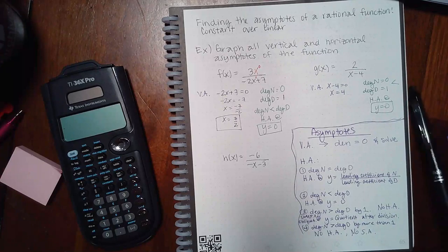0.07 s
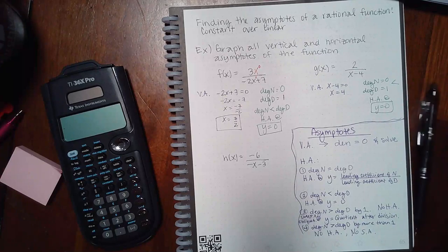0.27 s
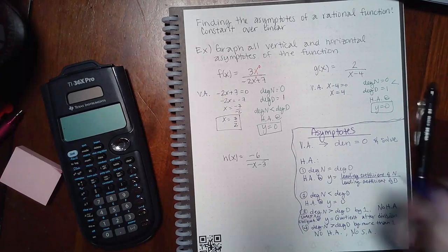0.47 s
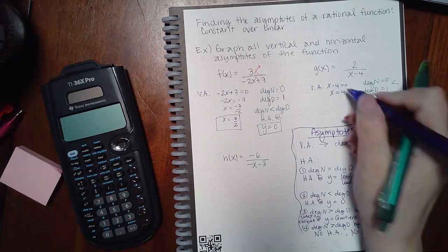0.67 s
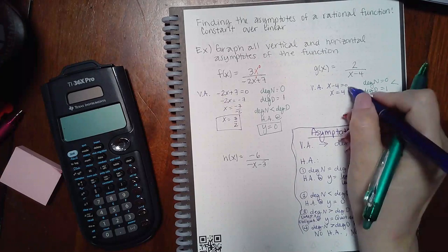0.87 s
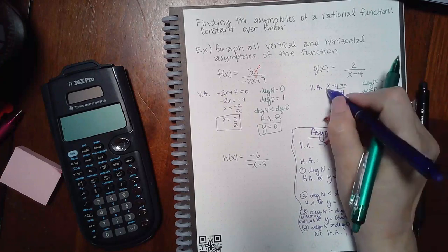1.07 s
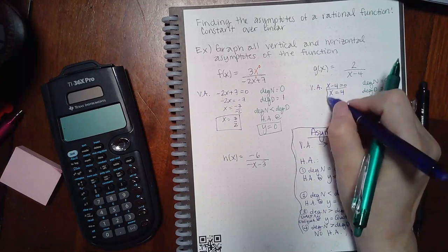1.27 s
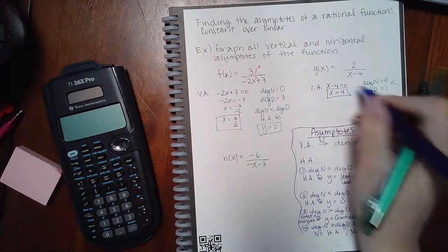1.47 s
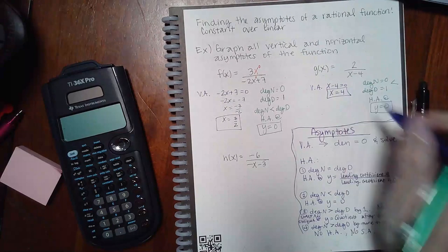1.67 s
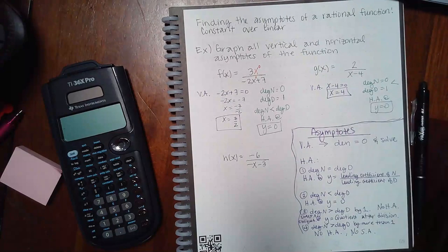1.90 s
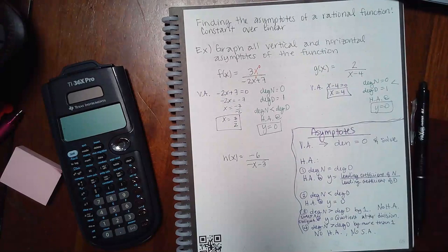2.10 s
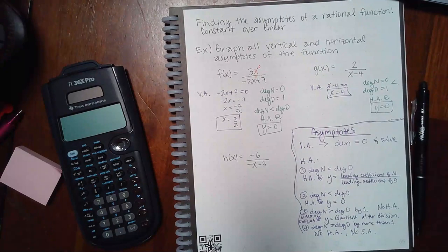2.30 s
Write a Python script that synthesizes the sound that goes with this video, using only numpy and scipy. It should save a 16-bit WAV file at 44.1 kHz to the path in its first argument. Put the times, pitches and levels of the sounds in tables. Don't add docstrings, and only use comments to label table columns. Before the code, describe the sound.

A plastic pen clatters onto a wooden desk in two sharp clicks, then faint pen strokes

```python
import sys
import numpy as np
from scipy import signal
from scipy.fft import rfft, irfft, next_fast_len
from scipy.io import wavfile
from scipy.ndimage import uniform_filter1d, map_coordinates

SR = 44100
rng = np.random.default_rng(int(sys.argv[2]) if len(sys.argv) > 2 else 0)


def transcribe(u):
    v = np.clip(np.atleast_2d(u).T, -1, 1)
    q = np.round(v * 32767).astype(np.int16)
    wavfile.write(sys.argv[1], SR, q)


def voltage_ratio(decibels):
    exponent = np.asarray(decibels, float) / 20
    return 10 ** exponent


N = 103458
LEAD = 4410

# freq_hz, density_db (per Hz)
CRACK_SPECTRUM = [(180, -47.5), (300, -28), (1170, -28.5), (3030, -19), (3640, -15), (4230, -10),
                  (6520, -7), (10400, 0.5), (16000, -12)]
# freq_hz, width_hz, level_db
BARREL_MODES = [
    [(1610, 180, -17.5), (5370, 300, -12.5), (7500, 400, -6.5), (9560, 400, -2), (10300, 130, -3),
     (11800, 330, -1), (13330, 350, 2.5), (14500, 350, -2)],
    [(2380, 290, -19), (4790, 500, -16), (5940, 250, -7.5), (7000, 230, -9), (9240, 250, 3),
     (10400, 250, -6), (12300, 300, -7), (14000, 430, -3.5)],
]


def unit(x):
    return x / np.sqrt(np.mean(x ** 2) + 1e-20)


def along(points, hz):
    freqs, values = np.transpose(points)
    return np.interp(np.log(hz + 1), np.log(freqs + 1), values)


def wobble(rate):
    knots = rng.standard_normal(int(N * rate / SR) + 4)
    return map_coordinates(knots, [np.arange(N) * rate / SR])


def filtered(x, response):
    size = next_fast_len(len(x) + 2048, real=True)
    return irfft(rfft(x, size) * response(np.fft.rfftfreq(size, 1 / SR)), size)[:len(x)]


def envelope(points):
    return lambda f: voltage_ratio(along(points, f))


def resonances(modes):
    def response(f):
        total = 0
        for k, (center, width, db) in enumerate(modes):
            damping = 1j * f * width
            total = total + (-1) ** k * voltage_ratio(db) * damping / (center * center - f * f + damping)
        return total
    return response


def noise(response, size=N):
    return unit(filtered(rng.standard_normal(size), response))


def burst(response, rise_s, t60, size=4000):
    t = np.arange(size) / SR
    rise = np.minimum(t / rise_s, 1) ** 2
    decay = voltage_ratio(-60 * np.maximum(t - rise_s, 0) / t60)
    return noise(response, size=size) * rise * decay


def add(track, s, x):
    i = round(s * SR) + LEAD
    track[i:i + len(x)] += x[:len(track) - i]


def swell(start, top, end):
    speed = np.interp(np.arange(N) / SR, [start, top, end], [0, 1, 0])
    return np.sin(np.pi / 2 * speed) ** 1.46


def room(x):
    # freq_hz, t60_s
    decay_times = [(300, .35), (2000, 0.55), (4000, 0.42), (8000, 0.36), (15000, 0.23)]
    hz, t, z = signal.stft(rng.standard_normal(SR // 2), SR, nperseg=256)
    decay = voltage_ratio(-60 * t / along(decay_times, hz)[:, None])
    tail = signal.istft(z * decay, SR, nperseg=256)[1]
    delayed = np.pad(x, (200, 0))
    return signal.fftconvolve(delayed, tail / np.linalg.norm(tail))[:len(x)]


def pen_drop():
    # start_s, peak_db, rise_ms, t60_s, thump_db
    blows = [
        (-.02, -0.5, 1, 0.012, -31.5),
        (0.023, 3.5, 2.53, 0.013, -32.5),
        (0.2623, 0, 1.3, 0.024, -54.5),
    ]
    # freq_hz, density_db (per Hz)
    desk_thump = [(59, -42.5), (100, 1), (576, -5), (961, -5), (1400, -9), (1650, 0.5), (2500, -6.5),
                  (3250, -6), (6500, -30), (9000, -120)]
    ring_db, thump_t60_s = -5, 0.38
    echo_db, echo_ring_db = 9.5, -14.5
    out = np.zeros(N + LEAD)
    crack = envelope(CRACK_SPECTRUM)
    one_end, other_end = map(resonances, BARREL_MODES)
    for (s, db, rise_ms, t60, thump_db), ring in zip(blows, [one_end, one_end, other_end]):
        crack_sound = burst(crack, rise_ms / 1000, t60)
        barrel_sound = burst(ring, 0.0012, 2.5 * t60)
        add(out, s, voltage_ratio(db - 8) * (crack_sound + voltage_ratio(ring_db) * barrel_sound))
        add(out, s, voltage_ratio(thump_db) * burst(envelope(desk_thump), .002, thump_t60_s, size=SR // 3))
        impulse = np.zeros(N + LEAD)
        add(impulse, s, np.array([voltage_ratio(db + echo_db)]))
        out += room(filtered(impulse, lambda f: crack(f) + voltage_ratio(echo_ring_db) * np.abs(ring(f))))
    tip_knock = resonances([(2310, 1230, 0)])
    add(out, .2628, voltage_ratio(-25.5) * burst(tip_knock, .0005, .012))
    return out


def clip_chatter():
    # start_s, peak_db
    rebounds = [(0.034, -20.5), (0.037, -20.5), (0.056, -28.5), (0.241, -52.5), (0.248, -46),
                (0.2685, -18.5), (0.27, -18.5), (.2742, -18), (0.28, -23.5), (0.3039, -20)]
    out = np.zeros(N + LEAD)
    crack = envelope(CRACK_SPECTRUM)
    ring = resonances(BARREL_MODES[1])
    for s, db in rebounds:
        add(out, s, voltage_ratio(db) * burst(lambda f: ring(f) + crack(f), .001, .012))
    return out


def background():
    # time_s, level_db
    hum_level = [(0.0, -49), (0.16, -41.5), (0.27, -46.5), (0.7, -41.5), (0.84, -43), (0.91, -48.5),
                 (0.99, -43.5), (1.12, -49.5), (1.21, -43), (1.59, -42.5), (1.67, -49), (1.77, -41.5),
                 (1.85, -45.5), (2.05, -41.5), (2.31, -44.5), (2.35, -39)]
    # freq_hz, width_hz, level_db
    fan_tones = [(116, 11, -69), (252.7, 34, -63.5), (722.4, 39, -68)]
    # freq_hz, density_db (per Hz)
    fan_spectrum = [(24, -42), (40, -9), (62, -11.5), (86, -24.5), (178, -20.5), (260, -21), (390, -25.5),
                    (496, -27), (1000, -45), (1300, -52.5), (2200, -120)]
    # freq_hz, density_db (per Hz)
    air_spectrum = [(530, -29), (900, -4.5), (1390, -3), (2450, -10.5), (3040, -11), (8250, -13.5),
                    (16000, -19.5)]
    hum_hz, hum_drift_rad, air_db, fan_db = 29.4, .8, -61.5, -55
    t = np.arange(N) / SR
    hum_phase = 2 * np.pi * hum_hz * t + hum_drift_rad * wobble(2.4)
    hum = np.sqrt(2) * voltage_ratio(np.interp(t, *np.transpose(hum_level))) * np.sin(hum_phase)
    tones = sum(voltage_ratio(db) * noise(resonances([(hz, width, 0)])) for hz, width, db in fan_tones)
    air = voltage_ratio(air_db + 0.87 * wobble(2.1)) * noise(envelope(air_spectrum))
    return hum + tones + air + voltage_ratio(fan_db) * noise(envelope(fan_spectrum))


def pen_ticks():
    # start_s, peak_db, pitch_hz, crack_db (under the ring)
    contacts = [(0.4594, -47.5, 7500, -0.5), (0.8826, -42, 9720, -3), (0.9057, -47, 9520, -1),
                (0.9476, -35.5, 9600, 3.5), (0.952, -44, 4900, -20), (0.962, -39, 5300, -20),
                (0.9745, -40, 7760, 1), (0.978, -39, 5030, -4), (0.985, -38, 5300, -2),
                (1.001, -46, 4790, -3), (1.0555, -42.5, 7760, 3.5), (1.067, -45, 5000, -6),
                (1.2116, -48.5, 7850, 1), (1.3385, -32, 9800, 1), (1.339, -37.5, 4800, -19),
                (1.3762, -44.5, 7700, 2), (1.4067, -41, 8500, -5), (1.4185, -34, 8250, 4),
                (1.4207, -28, 5040, 0), (1.421, -28.5, 10800, -0.5), (1.432, -42, 5100, -19),
                (1.439, -44, 5000, -20), (1.4555, -44, 10500, -8), (1.4738, -35.5, 9290, -7),
                (1.48, -46, 6500, -14), (1.5497, -21, 7530, 2.5), (1.554, -28, 6830, 5),
                (1.5624, -28.5, 9040, -4), (1.566, -37.5, 4930, -7), (1.5979, -33.5, 11400, 4),
                (1.6064, -35, 11800, -1), (1.6702, -28, 9640, 6.5), (1.6884, -36, 9200, 0),
                (1.7134, -22.5, 9230, 4.5), (1.7155, -19, 7500, 7), (1.7178, -21, 9280, -3),
                (1.7202, -20, 9300, 2), (1.7245, -23, 9500, 4.5), (1.7553, -33, 9450, -2),
                (1.7595, -38, 9400, -6), (1.7829, -23.5, 9630, -1), (1.7997, -27, 9630, -2),
                (1.8045, -24.5, 9400, -8), (1.831, -42, 9350, -5), (1.8836, -41.5, 4560, -15.5),
                (1.927, -33.5, 5770, 0), (2.0624, -36.5, 5080, -14.5), (2.2013, -48, 4170, -20),
                (2.2985, -30.5, 9220, 1), (2.304, -42.5, 4700, -20)]
    # start_s, level_db
    taps = [(0.948, -49), (0.974, -60), (1.055, -52), (1.338, -50.5), (1.406, -52.5), (1.42, -53.5),
            (1.548, -48), (1.598, -54), (1.7141, -38), (1.926, -53.5)]
    # freq_hz, width_hz, level_db
    pad_modes = [(1600, 850, -14.5), (2990, 590, -8), (4960, 480, -2)]
    rise_s, t60_s, relative_width, low_cut_hz = .0006, 0.019, 0.22, 6000
    out = np.zeros(N + LEAD)
    thin_crack = lambda f: voltage_ratio(along(CRACK_SPECTRUM, f)) / (1 + (low_cut_hz / (f + 1)) ** 8)
    for s, db, hz, crack_db in contacts:
        mode = resonances([(hz, relative_width * hz, 0)])
        ring = burst(lambda f: mode(f) ** 2, rise_s, t60_s)
        crack = burst(thin_crack, rise_s, .8 * t60_s)
        add(out, s - .0005, voltage_ratio(db - 8.5) * (ring + voltage_ratio(crack_db) * crack))
    for s, db in taps:
        add(out, s, voltage_ratio(db) * burst(resonances(pad_modes), 0.00052, 0.052))
    return out


def gritty(spectrum):
    grain_db = 2.2
    return unit(noise(envelope(spectrum)) * voltage_ratio(grain_db * wobble(350) + wobble(60)))


def pen_strokes():
    # start_s, peak_s, end_s, hiss_db, rumble_db
    lines = [
        (0.775, 0.833, 0.89, -56, -51.5),
        (0.93, 0.98, 0.98, -57, -51),
        (1.048, 1.108, 1.169, -54, -50.5),
        (1.201, 1.228, 1.27, -57, -55.5),
    ]
    # freq_hz, density_db (per Hz)
    paper_spectrum = [(900, -29.5), (1500, -10), (2800, -12), (4200, -11), (5000, -5), (6500, -7.5),
                      (9400, -4), (16000, -16)]
    # freq_hz, width_hz, level_db
    desk_modes = [(524, 230, -2), (740, 204, -2), (1410, 240, -14.5)]
    hiss = gritty(paper_spectrum)
    rumble = unit(noise(resonances(desk_modes)) * voltage_ratio(1.5 * wobble(79.9)))
    out = np.zeros(N)
    for start, top, end, hiss_db, rumble_db in lines:
        out += swell(start, top, end) * (voltage_ratio(hiss_db) * hiss + voltage_ratio(rumble_db) * rumble)
    return out


def hand_rustles():
    # start_s, peak_s, end_s, level_db
    shifts = [
        (1.397, 1.44, 1.57, -58),
        (1.545, 1.604, 1.71, -56.5),
        (1.627, 1.664, 1.713, -46.5),
        (1.687, 1.738, 1.79, -49),
        (1.767, 1.8, 2.04, -54),
    ]
    # freq_hz, density_db (per Hz)
    skin_spectrum = [(900, -24), (1500, -11.5), (3200, -8), (4200, -3), (6000, -6), (9400, -8),
                     (13000, -11), (16000, -11.5)]
    return gritty(skin_spectrum) * sum(swell(*span) * voltage_ratio(db) for *span, db in shifts)


def barrel_squeaks():
    # start_s, peak_s, end_s, pitch_hz, level_db
    rubs = [(1.585, 1.635, 1.67, 2430, -63), (1.6, 1.612, 1.65, 3950, -65), (1.6, 1.62, 1.64, 4950, -66),
            (1.635, 1.655, 1.69, 5050, -58), (1.64, 1.655, 1.68, 5650, -58),
            (1.638, 1.652, 1.665, 3800, -57), (1.638, 1.655, 1.672, 1200, -58),
            (1.71, 1.75, 1.8, 3780, -64), (1.78, 1.8, 1.82, 5400, -56), (1.778, 1.785, 1.8, 7300, -54),
            (1.78, 1.79, 1.81, 3850, -62), (1.797, 1.802, 1.813, 9500, -44),
            (1.723, 1.726, 1.734, 4900, -45), (1.726, 1.73, 1.737, 9400, -39)]
    glide_per_s, flutter_hz = .6, 200
    out = np.zeros(N)
    for start, top, end, hz, db in rubs:
        t = np.arange(N) / SR - top
        phase = 2 * np.pi * hz * t * (1 + glide_per_s * t / 2) + 1.8 * wobble(flutter_hz)
        level = voltage_ratio(db + 5 + 3.7 * wobble(flutter_hz))
        out += level * swell(start, top, end) * np.sin(phase)
    return out


def scene():
    ticks = pen_ticks()
    room_db = -10.5
    impacts = pen_drop() + clip_chatter() + ticks + voltage_ratio(room_db) * room(ticks)
    friction = pen_strokes() + hand_rustles() + barrel_squeaks()
    return (impacts[LEAD:] + friction + background())[None]


def low_pass(x):
    return signal.sosfilt(signal.butter(12, 16480, fs=SR, output="sos"), x)


def record(dry):
    # start_s, length_s, share_lost (0 to 1), low_hz, high_hz
    dropouts = [(.2515, .0085, 1, 1300, 22000), (.165, .02, .4, 1300, 22000), (.6, .022, .7, 1000, 22000),
                (.785, .022, .7, 1300, 22000), (1.343, .022, .6, 1800, 22000), (1.345, .01, 1, 6100, 7400),
                (1.642, .016, .35, 1500, 22000), (1.786, .012, .4, 3900, 22000),
                (1.786, .016, .75, 500, 3500), (1.85, .02, .4, 800, 22000), (2.108, .022, .5, 2000, 22000)]
    band_hz, edge_hz, edge_db, edge_opens_db, fade_s = 330, 15900, -30, -20, .003
    t = np.arange(N) / SR
    x = filtered(dry[0], lambda f: voltage_ratio(edge_db / 2 * (1 + np.tanh((f - edge_hz) * 2 / band_hz))))
    brightness = uniform_filter1d(np.abs(np.diff(dry[0], prepend=0)), size=300)
    x = x + (dry[0] - x) * np.clip(brightness / voltage_ratio(edge_opens_db) - .2, 0, 1)
    for s, length, share, low_hz, high_hz in dropouts:
        lost = rng.random(size=80) < share
        part = filtered(x, lambda f: lost[(f // band_hz).astype(int)] * (f > low_hz) * (f < high_hz))
        gate = np.interp(t, [s - .001, s, s + length, s + length + .001], [0, 1, 1, 0])
        x = x - part * gate * (.9 + .1 * share ** 9)
    x = x * np.sin(np.pi / 2 * np.clip((t[-1] - t) / fade_s, 0, 1))
    return low_pass(np.clip(x[None], -1, 1))


dry = scene()
out = record(dry)
transcribe(out)
```